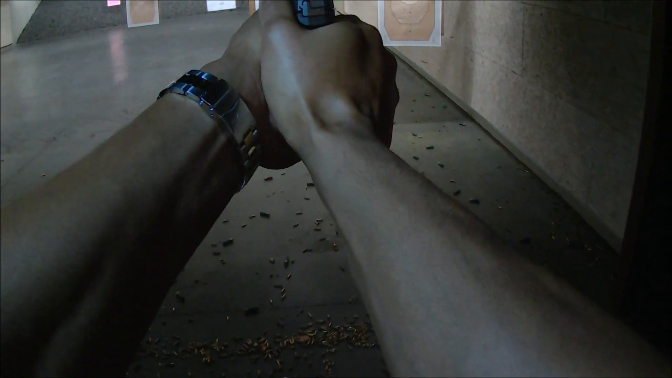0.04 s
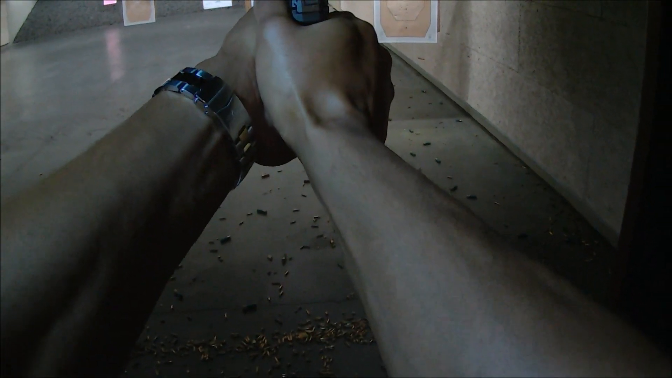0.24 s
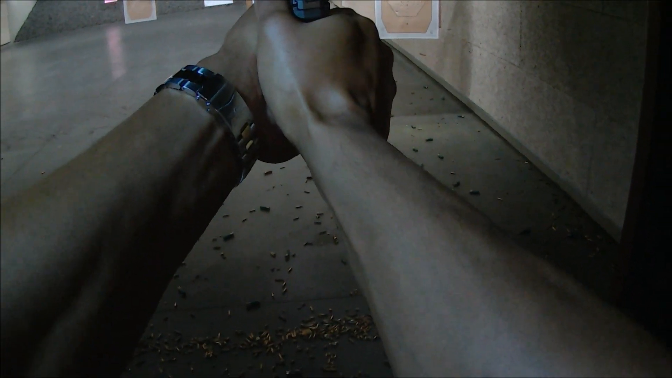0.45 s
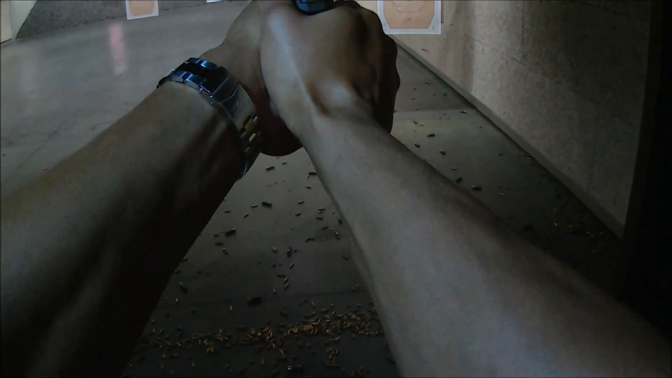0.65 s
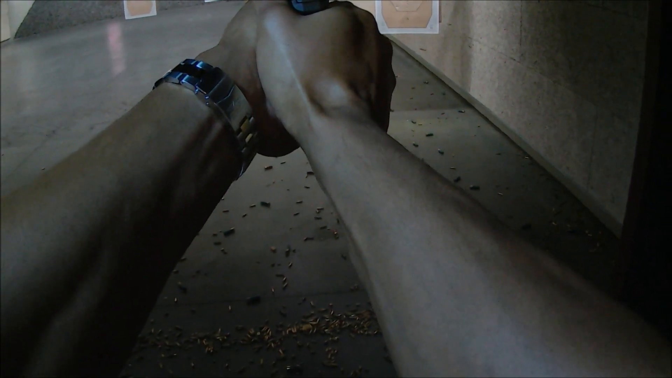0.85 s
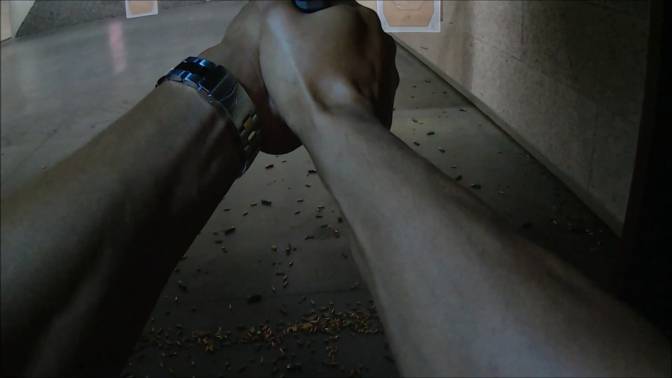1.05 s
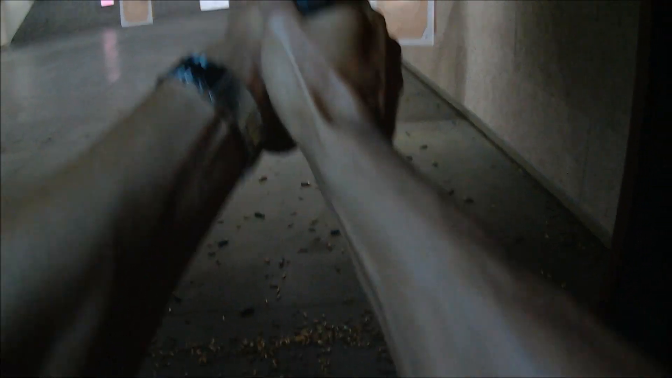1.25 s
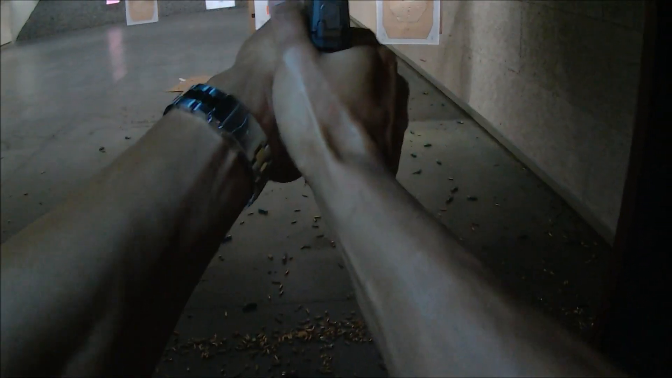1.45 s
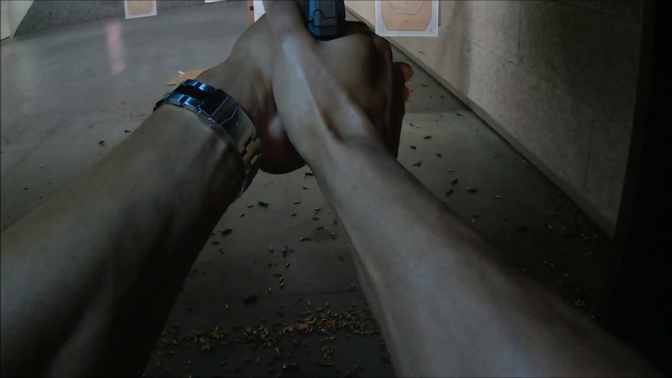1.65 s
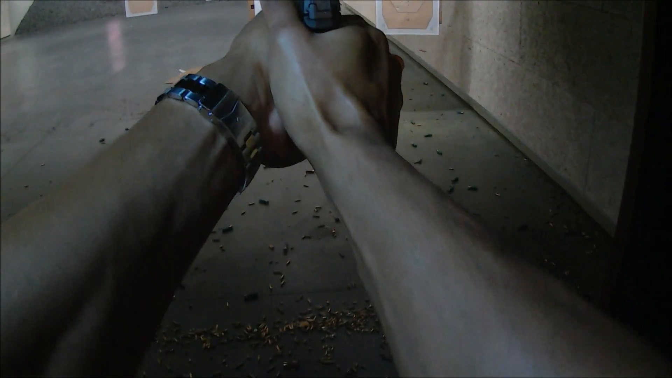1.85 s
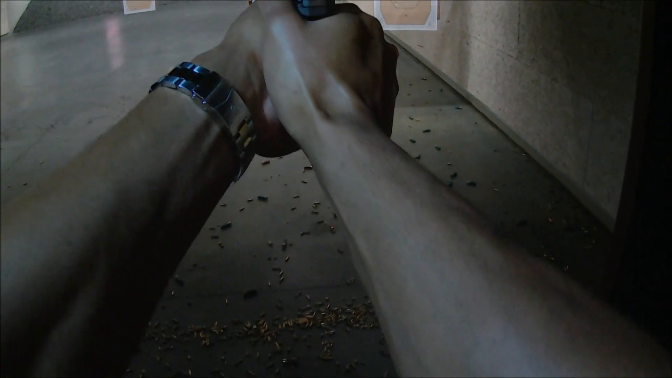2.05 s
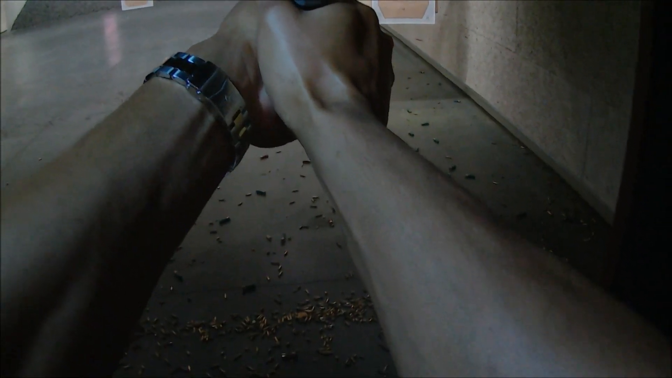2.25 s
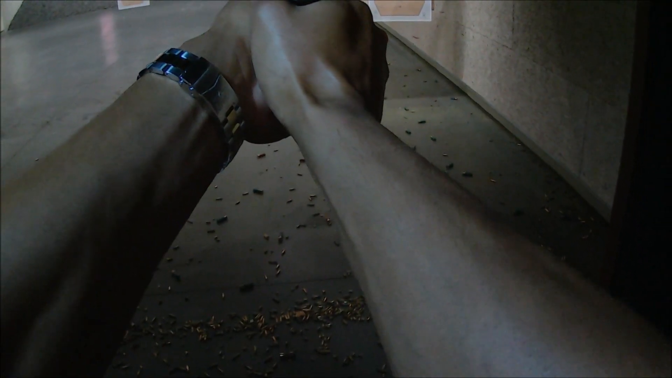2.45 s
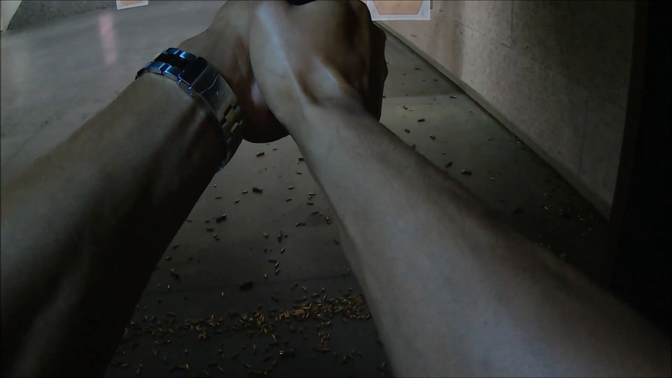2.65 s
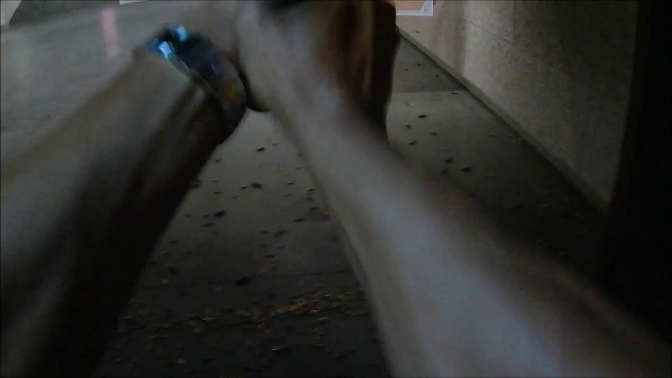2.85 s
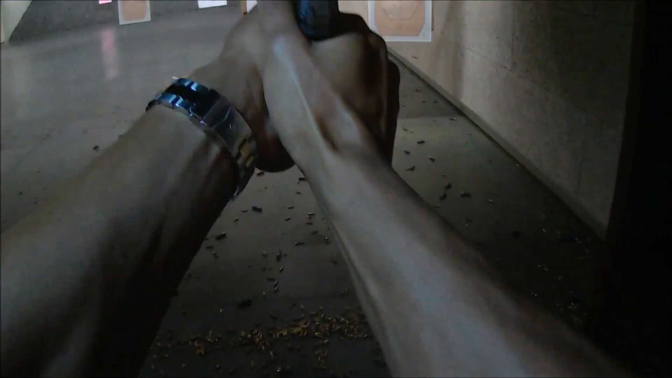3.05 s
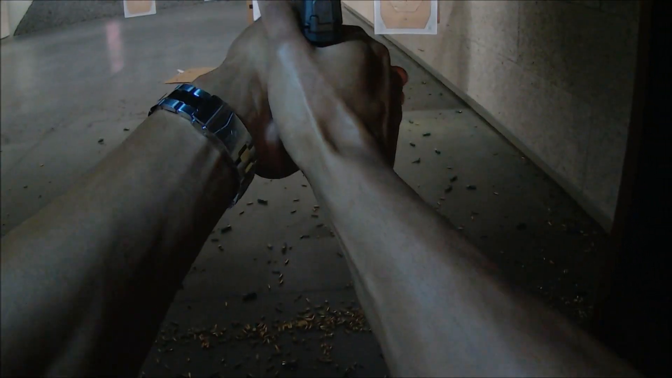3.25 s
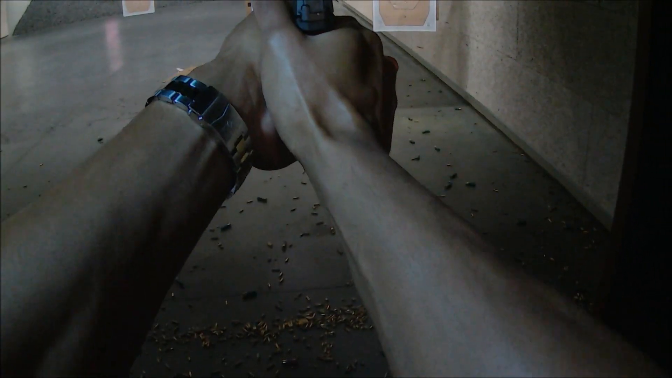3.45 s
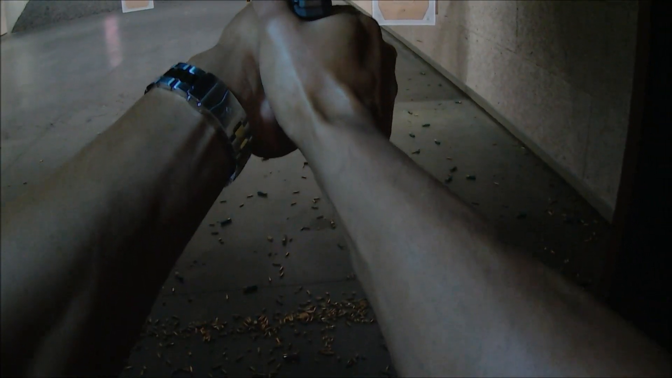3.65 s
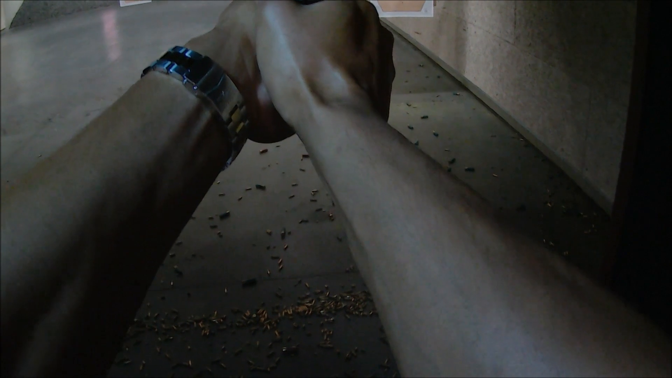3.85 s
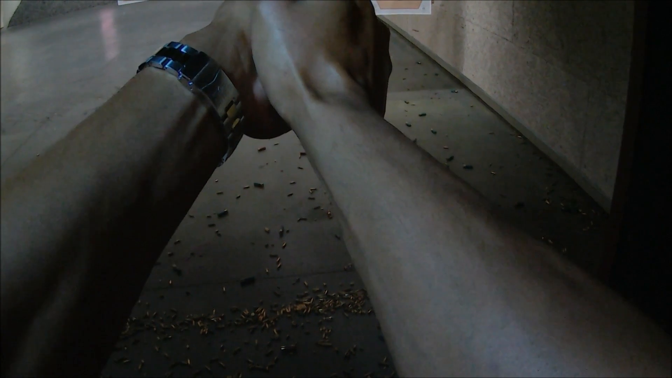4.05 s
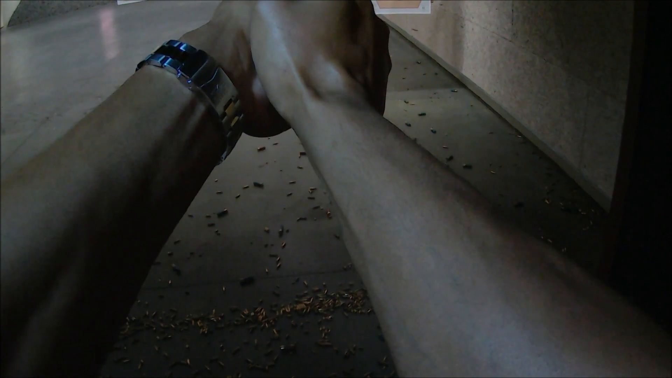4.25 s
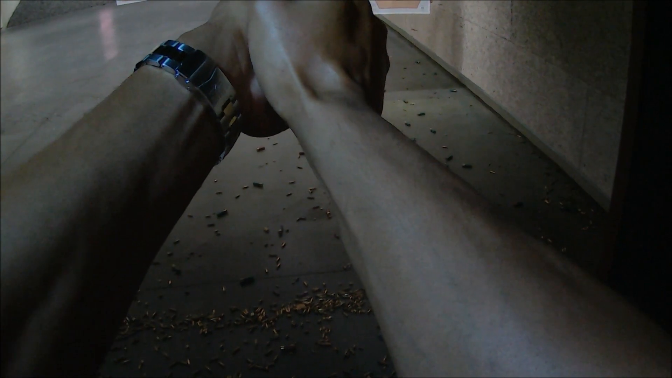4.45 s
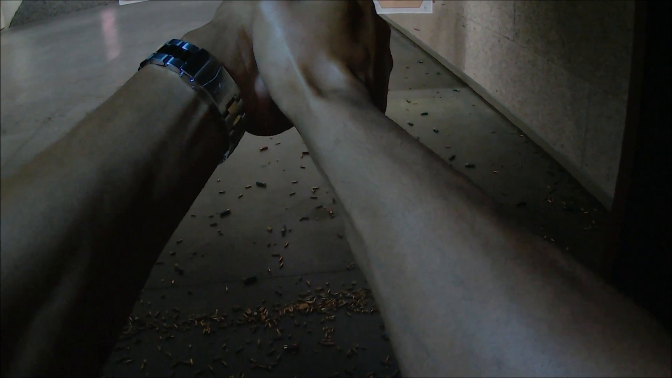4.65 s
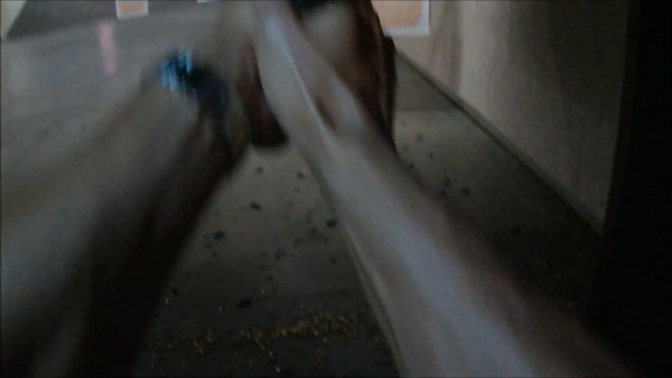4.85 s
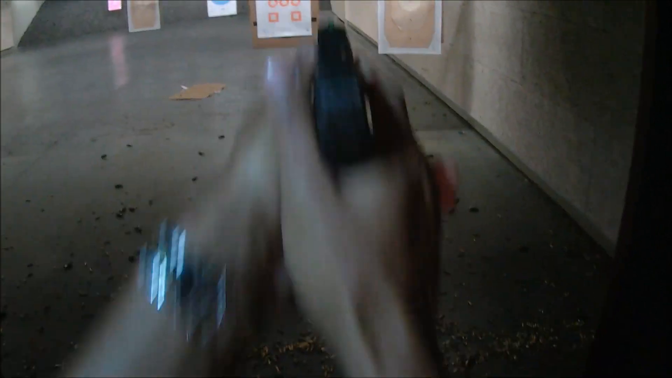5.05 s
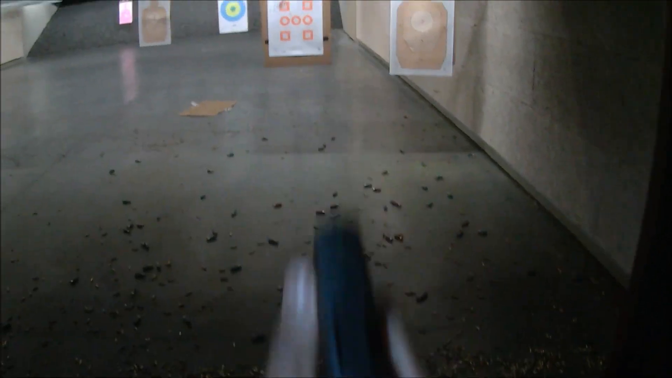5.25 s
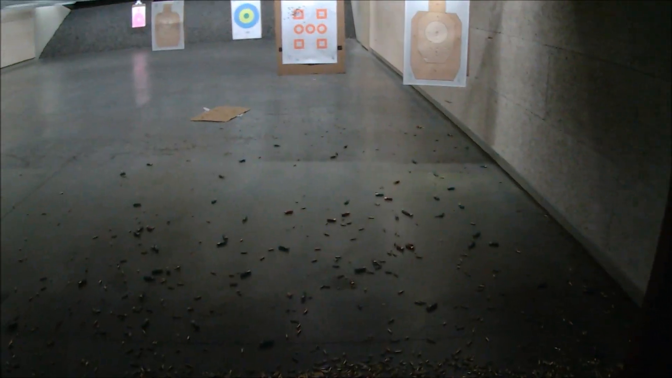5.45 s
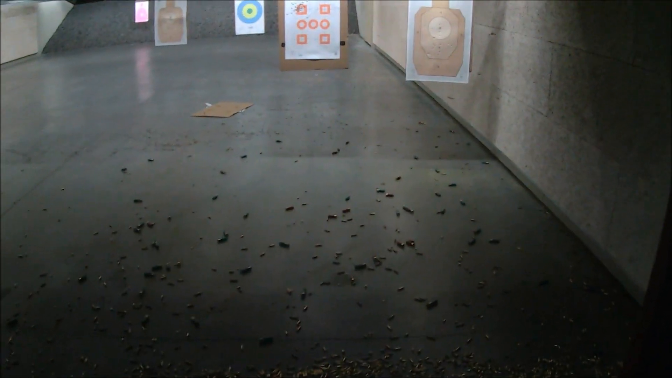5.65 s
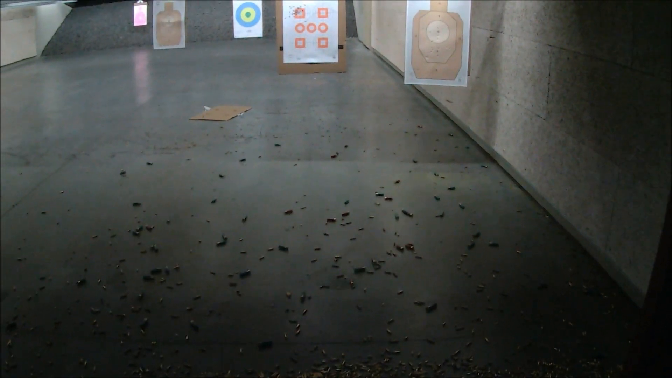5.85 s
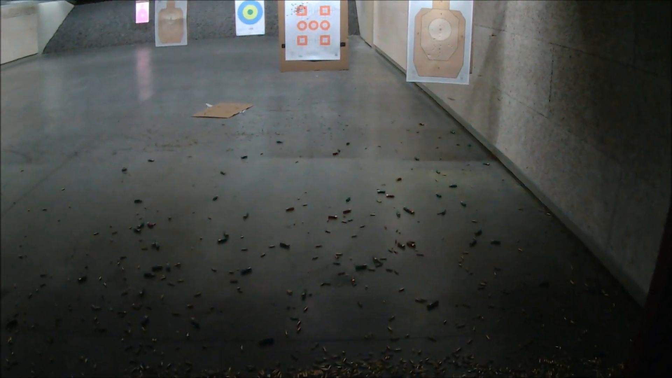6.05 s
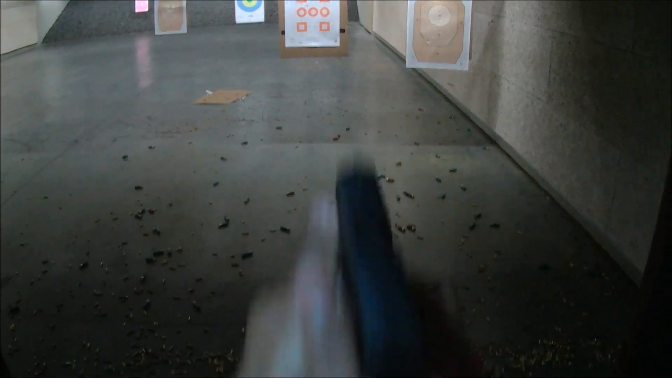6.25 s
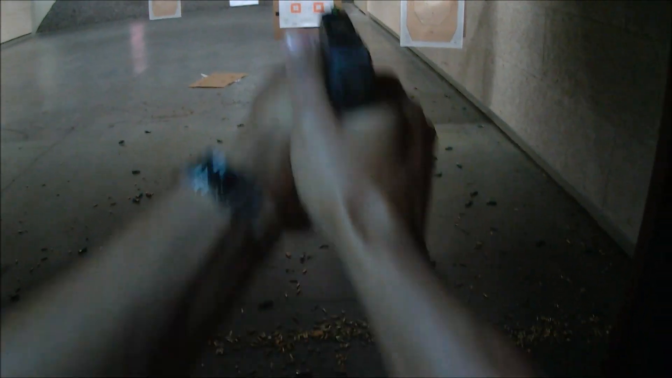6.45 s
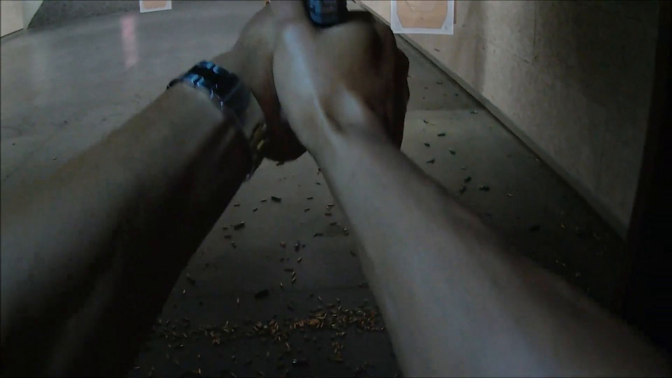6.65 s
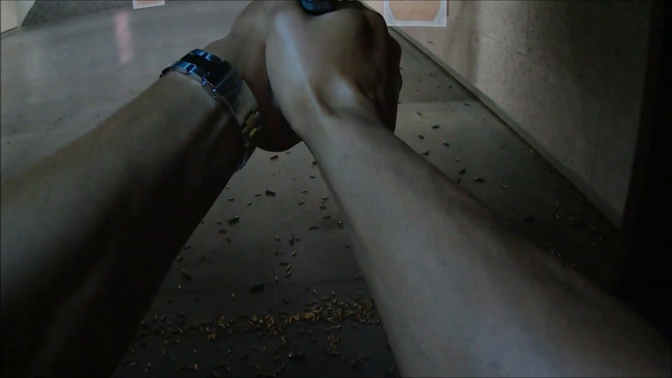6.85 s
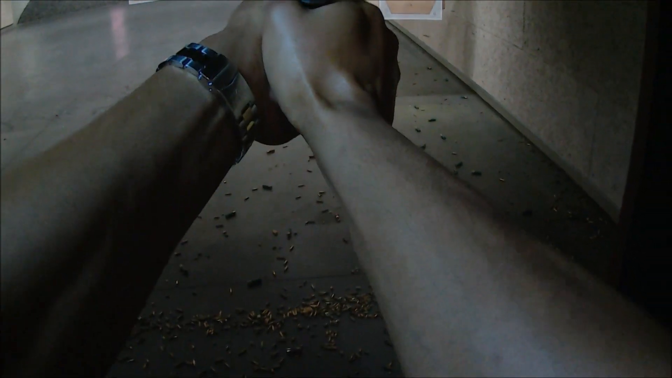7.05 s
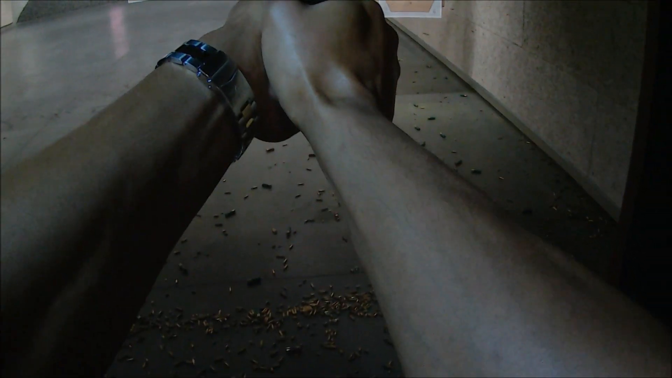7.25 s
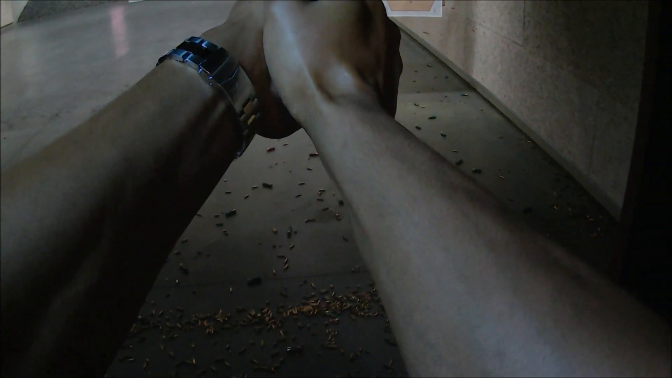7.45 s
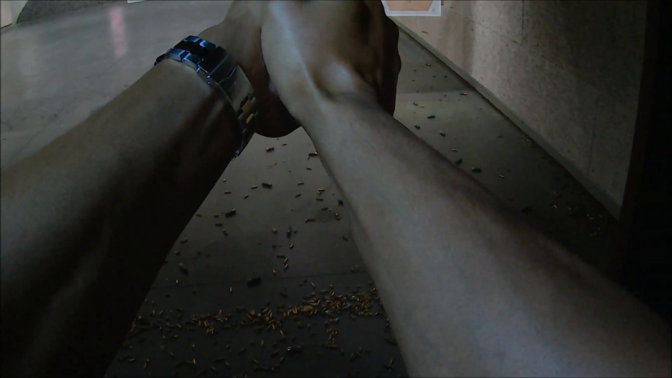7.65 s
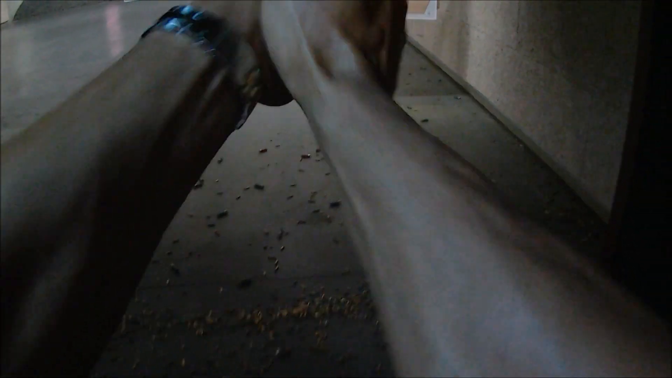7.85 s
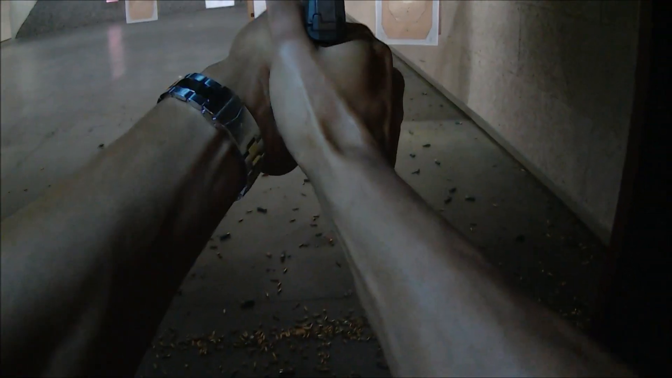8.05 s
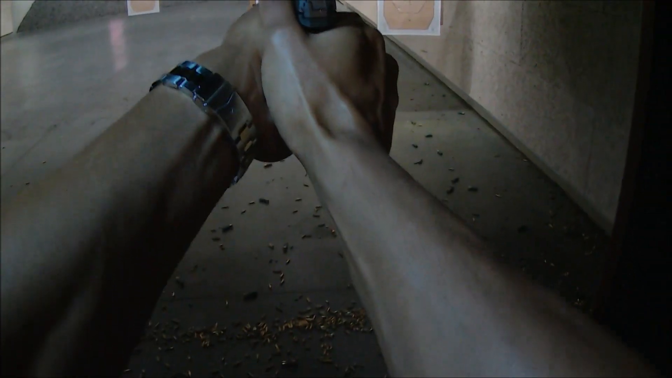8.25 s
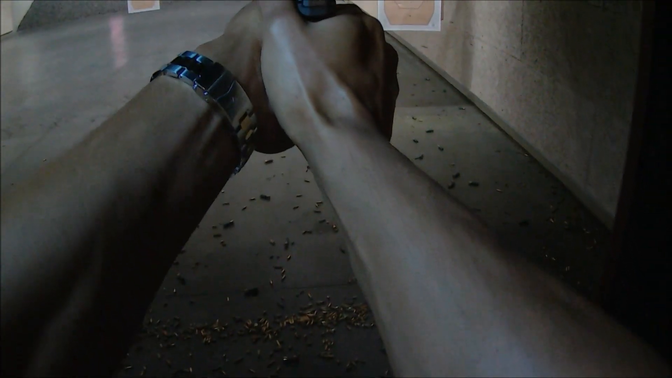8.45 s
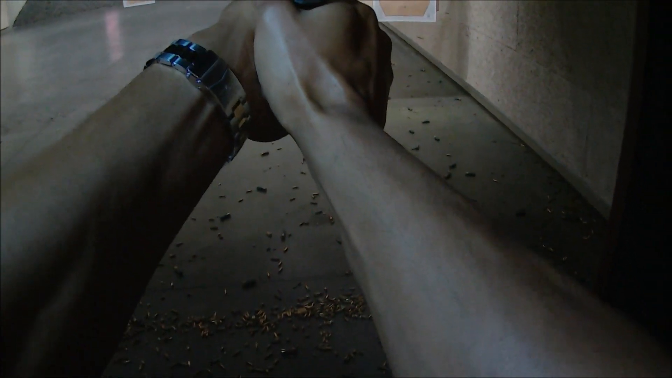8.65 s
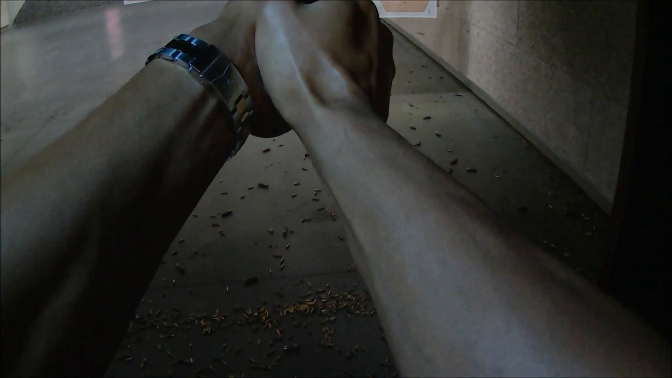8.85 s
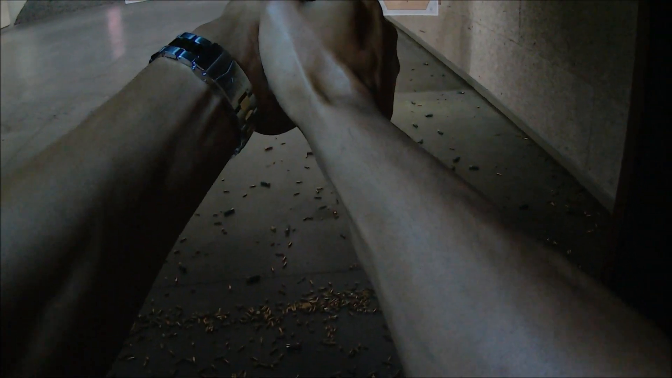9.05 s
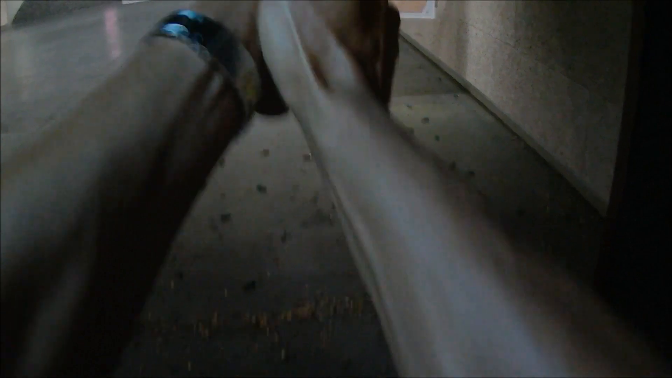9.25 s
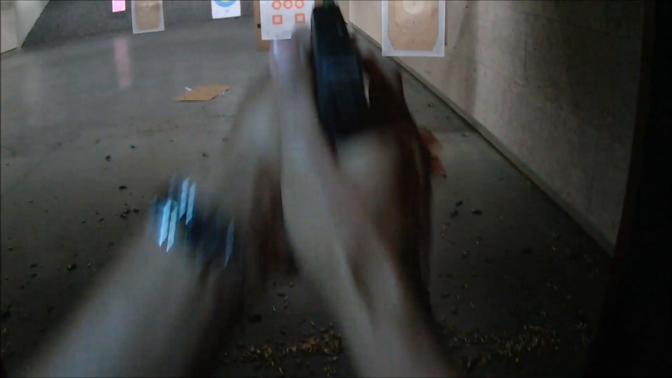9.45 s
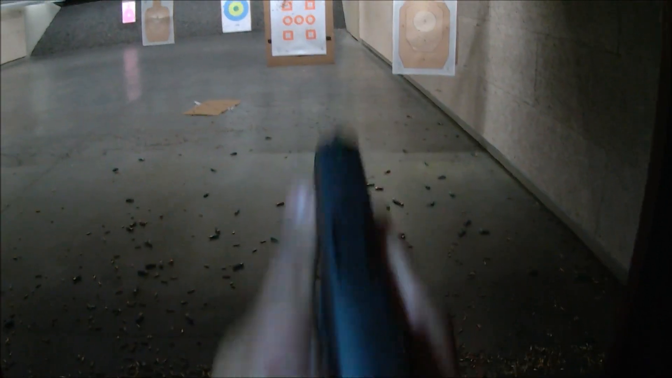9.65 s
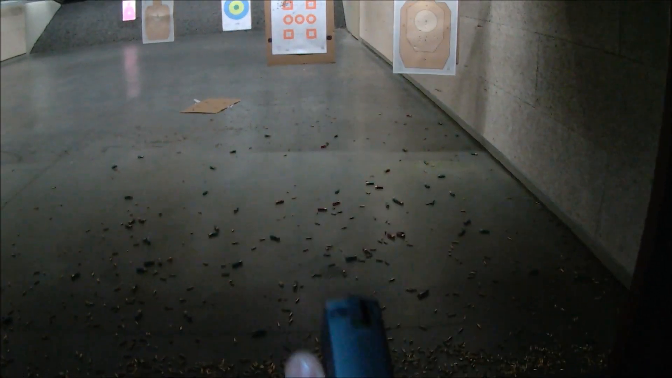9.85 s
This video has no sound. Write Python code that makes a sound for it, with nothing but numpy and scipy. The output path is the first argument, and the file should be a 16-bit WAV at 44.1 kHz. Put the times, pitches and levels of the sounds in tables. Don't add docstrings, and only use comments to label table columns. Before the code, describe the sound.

A steady, muffled ventilation rush fills a concrete shooting hall. A casing ticks at 0.2 s and a distant hinge squeaks softly around 0.3-0.5 s. At 1.1 s two pistols fire almost together, a harsh overloaded bang with dense echo and low boom; brass tinkles near 1.5-1.9 s. A dull far door thud at 2.75 s is swallowed by a near shot at 2.9 s. Casings and a soft knock follow at 3.3 s. Shots from different lanes hit at 4.2 and 4.7 s, with a sharp click between; a casing rings at 5.6 s. More blasts come at 6.2, 6.8 and 7.8 s, with a click at 7.2 s and a firm case knock at 7.3 s. A hard knock rattles at 8.5 s. The strongest shot cracks at 9.2 s, a casing clinks at 9.5 s, and the hardest knock lands at 9.9 s in the fading echo.

```python
import sys
import numpy as np
from scipy import signal
from scipy.io import wavfile
from scipy.ndimage import uniform_filter1d

SR = 44100
rng = np.random.default_rng(int(sys.argv[2]) if len(sys.argv) > 2 else 0)


def ratio(d):
    e = np.asarray(d, float) / 20
    return 10 ** e


def int16_out(signal):
    q = np.round(np.clip(np.atleast_2d(signal).T, -1, 1) * 32767)
    wavfile.write(sys.argv[1], SR, q.astype(np.int16))


N = 436590


def evened(x):
    return x / np.sqrt(np.mean(x ** 2) + 1e-20)


def read(points, hz):
    f, value = np.transpose(points)
    return np.interp(np.log(hz + 1), np.log(f + 1), value)


def add(mix, s, sound):
    part = mix[round(s * SR):][:len(sound)]
    part += sound[:len(part)]


def ring(x, hz, width):
    return signal.lfilter(*signal.iirpeak(hz, hz / width, SR), x)


def line_filter():
    coupling_hz, treble_lift = 61.9, .15
    pole = np.exp(-2 * np.pi * coupling_hz / SR)
    return np.convolve([1, -1], [1 + treble_lift, -treble_lift]), [1, -pole]


# frequency in Hz, level in dB.
CASE_PASSES = [(430, -9), (1000, -4), (1550, 0), (2500, -13), (3300, -6.5), (5200, -28), (10000, -37.5),
               (13000, -66.5)]


def noise(seconds, db_at, size=1024):
    hop = size // 4
    hz = np.fft.rfftfreq(size, 1 / SR)
    t = np.arange(seconds * SR // hop + 5) * hop / SR
    real, imaginary = rng.standard_normal((len(t), len(hz), 2)).T
    line_gain = abs(signal.freqz(*line_filter(), np.maximum(hz, 20), fs=SR)[1])
    case_gain = ratio(read(CASE_PASSES, hz)) / line_gain
    z = (real + 1j * imaginary) * ratio(db_at(hz[:, None], t)) * case_gain[:, None]
    return signal.istft(z, nperseg=size, noverlap=size - hop)[1][:seconds * SR]


# frequency in Hz, level in dB per Hz.
AIR_COLOUR = [(25, 10), (50, 12), (85, 13.5), (120, 2.5), (160, 0.), (230, 4), (320, -1.5), (430, 0.)]


def ventilation():
    air_db, swell_db = -46, 0.77
    rates_hz = np.geomspace(.2, 5, 12)[:, None]
    phases = rng.random(rates_hz.shape)

    def level_db(hz, t):
        swell = evened(np.sin(2 * np.pi * (rates_hz * t + phases)).sum(0))
        return read(AIR_COLOUR, hz) + swell_db * swell

    rush = noise(10, level_db, size=4096)[:N]
    return ratio(air_db) * rush / np.std(signal.lfilter(*line_filter(), rush))


# start in seconds, peak in dB, low ring in dB, high ring in dB.
CASING_BOUNCES = [(.2214, -49, -10, -15), (1.503, -45.5, -8, 0.), (1.68, -56, -10, -20),
                  (1.75, -43, -3, -20), (1.8896, -51.5, -12, 1.5), (2.4987, -52, -2.5, -8),
                  (3.2919, -45, -3, -4), (3.3548, -44, -3, -15), (3.7504, -54, -12, -3),
                  (5.43, -60, -15, 4), (5.5847, -38, -4, -11), (6.1365, -50, -10, -5),
                  (6.48, -49, -12, -2.5), (6.5894, -54, -12, -9), (6.66, -55, -12, 3),
                  (6.79, -52, -10, -11), (7.291, -33, -8, -22), (7.4894, -54, -10.5, -15),
                  (8.31, -57, -11, 1.5), (8.5544, -52, -8, 3), (8.83, -60, -12, 1.5),
                  (9.1494, -60, -5, -20), (9.4903, -36, -15, -24)]
# frequency in Hz, width in Hz.
BRASS_TONES = [(5200, 700), (9700, 450), (10850, 110)]


def casings():
    t, out = np.arange(SR // 3) / SR, np.zeros(N)
    for s, peak_db, low_db, high_db in CASING_BOUNCES:
        t60 = max(.13 + .003 * high_db, .03)
        scrape = rng.standard_normal(len(t))
        tick = ring(ring(scrape, 7500, 8000), 7500, 8000) * ratio(-5.5 - 60 * t / (.6 * t60))
        low, mid, high = (evened(ring(ring(scrape, hz, width), hz, width)) for hz, width in BRASS_TONES)
        rings = (ratio(low_db) * low + ratio(-11) * mid) * ratio(-60 * t / t60)
        rings += ratio(high_db - 3 - 16 * t / t60) * high
        add(out, s, ratio(peak_db) * (tick + .5 * rings))
    return out


# start in seconds, frequency in Hz, level in dB, rise in seconds, t60 in seconds.
DOOR_TONES = [
    (.29, 1020, -43, .04, .35),
    (.4, 1200, -46, .025, .22),
    (2.75, 146, -33., 0.1, .6),
]


def far_door():
    t, out = np.arange(SR // 2) / SR, np.zeros(N)
    for s, hz, db, rise, t60 in DOOR_TONES:
        envelope = ratio(db - 60 * t / t60) * (1 - np.exp(-(t / rise) ** 2))
        add(out, s, envelope * np.sin(2 * np.pi * hz * t))
    return out


# frequency in Hz, t60 in seconds.
HALL_T60 = [(50, 1.05), (130, .58), (300, .5), (800, .73), (1400, .63), (3000, .59), (6400, .4)]
# frequency in Hz, level in dB.
DOWN_RANGE = [(200, -15.5), (800, -18.5), (2000, -26.5)]


def echo(colour, lane):
    level_db, early_db, early_s, _, stretch = lane
    backstop_s, backstop_width_s, backstop_db = .185, .07, 3.8
    down_range_t60 = 2.1

    def level(hz, t):
        age = t - .25
        early = early_db * np.exp(-t / early_s)
        backstop = backstop_db * np.exp(-((t - backstop_s) / backstop_width_s) ** 2)
        main = ratio(early + backstop - 60 * age / (stretch * read(HALL_T60, hz)))
        late = ratio(read(DOWN_RANGE, hz) - 60 * age / down_range_t60)
        return read(colour, hz) + 20 * np.log10(np.hypot(main, late))

    x = noise(2, level)
    mids = ring(x, 1200, 1500)[SR // 5:SR * 3 // 10]
    return ratio(level_db) * x / np.std(mids)


# start in seconds, blast strength in dB.
LEFT_FIRES = [
    (1.1300, 0.),
    (4.1688, .7),
    (6.1578, 0.),
]
NEAR_FIRES = [
    (1.1450, -0.3),
    (2.8770, .1),
    (4.7442, 0.5),
    (7.8269, -.2),
    (9.2205, 1.2),
]
RIGHT_FIRES = [
    (6.8355, 0.),
]
# frequency in Hz, level in dB per Hz.
LEFT_ECHO = [(40, 1.5), (80, 7), (300, -9), (700, -5), (1500, -8.5), (2300, -14), (3400, -14), (5000, -19)]
NEAR_ECHO = [(45, -1.5), (85, 6), (330, -4.5), (700, 5), (1500, .3), (2100, -7.5), (3400, -7.5),
             (5000, -12.5)]
RIGHT_ECHO = [(40, .5), (80, 7.5), (330, -7), (800, -3), (1500, -8), (2120, -12.5), (3640, -12.5),
              (6000, -14)]
# frequency in Hz, level in dB, t60 in seconds, build-up in seconds.
LEFT_MODES = [(45, 6, .22, .003), (63.94, -3, 1.304, 0.022), (81.04, -4.5, .9, .08), (100, 4.5, .2, .004),
              (144.2, 2.5, .65, .04), (285, 1.5, .35, .02)]
NEAR_MODES = [(61, -10, 1.1, .1), (69.8, -8, 1., .1), (79, -3.5, .9, .1), (141.9, -2.5, .6, .04),
              (336, 12, .3, .02), (1228, 7, .4, .04)]
RIGHT_MODES = [(81, 6, 0.87, .1), (62, -7, 1.2, .08), (140, 2.5, .55, .02), (335, 10, .3, .02),
               (390.4, 8, .3, .02)]
# mid echo in dB at a quarter second, extra early echo in dB, its fade in seconds,
# echo build-up in seconds, decay stretch as a factor.
LEFT_SPACE = (-14.8, -1.5, 0.12, 0.012, 1.0)
NEAR_SPACE = (-14.3, 4.8, 0.13, 0.0015, .98)
RIGHT_SPACE = (-12.8, 1.5, 0.15, 0.002, 1.01)
# front in dB, bounce in Hz, front fade in seconds,
# bright slap in dB, slap t60 in seconds.
LEFT_MUZZLE = (18., 520, .004, 3., .2)
NEAR_MUZZLE = (18., 650, .0012, 13.3, .15)
RIGHT_MUZZLE = (16., 600, .002, 10.5, .12)


def gun(shots, colour, boom, lane, blast, same=.93):
    t, out = np.arange(2 * SR) / SR, np.zeros(N)
    front_db, bounce_hz, front_s, slap_db, slap_t60 = blast
    slap_hz, slap_width_hz = 2900, 2400
    pattern = echo(colour, lane)
    waves = np.zeros(len(t))
    for hz, db, t60, rise in boom:
        envelope = ratio(db - 60 * t / t60) * (1 - np.exp(-(t / rise) ** 2))
        waves -= envelope * np.sin(2 * np.pi * hz * t)
    front = -ratio(front_db) * np.sin(2 * np.pi * bounce_hz * t) * np.exp(-t / front_s)
    build = 1 - np.exp(-(t / lane[3]) ** 2)
    for s, strength_db in shots:
        tail = same * pattern + np.sqrt(1 - same ** 2) * echo(colour, lane)
        hiss = rng.standard_normal(len(t))
        bright = evened(ring(ring(hiss, slap_hz, slap_width_hz), slap_hz, slap_width_hz))
        slap = bright * ratio(slap_db - 60 * t / slap_t60) * np.minimum(t * bounce_hz, 1)
        add(out, s, ratio(strength_db) * (front + waves + tail * build + slap))
    return out


# start in seconds, peak in dB, body in Hz, body in dB, t60 in seconds.
CASE_KNOCKS = [
    (3.2915, -30, 1250, -14, .07),
    (7.291, -19, 1250, -14, .16),
    (8.5264, -9, 1450, -4.5, .12),
    (8.5544, -27, 1600, -2.5, .1),
    (8.8384, -35, 1700, -3.5, .04),
    (9.662, -31, 1250, -19, .36),
    (9.88, -6, 1000, 9, .12),
]
# frequency in Hz, width in Hz, level in dB.
CASE_SHELL = [(3350, 420, -3), (8000, 3000, -25)]


def knocks():
    t, out = np.arange(SR // 3) / SR, np.zeros(N)
    band = signal.butter(2, (500, 9000), "band", fs=SR)
    for s, peak_db, body_hz, body_db, t60 in CASE_KNOCKS:
        scatter = ratio(-21 + 60 * t60 - 60 * t / t60)
        crack = ratio(-60 * t / 0.011)
        blow = rng.standard_normal(len(t)) * (crack + scatter) * np.minimum(t / 0.0018, 1)
        body = np.zeros(len(t))
        for hz, width, db in CASE_SHELL + [(body_hz, 850, body_db)]:
            body += ratio(db) * ring(ring(blow, hz, 1.4 * width), hz, 1.4 * width) / np.sqrt(width)
        body = signal.lfilter(*band, body)
        add(out, s, ratio(peak_db) * body / abs(body).max())
    return out


# start in seconds, peak in dB.
DRY_CLICKS = [
    (4.387, -9),
    (6.5894, -36),
    (7.1896, -18),
    (8.2906, -37),
    (9.4903, -24),
    (9.891, -28),
]


def clicks():
    t, out = np.arange(SR // 3) / SR, np.zeros(N)
    hz, width_hz, makeup_db = 6000, 6500, 13.
    click = ring(ring(1. * (t == 0), hz, width_hz), hz, width_hz)
    for s, db in DRY_CLICKS:
        add(out, s, ratio(db + makeup_db) * click)
    return out


def preamp(x):
    rail, flip_at, flip_share = 0.69, 1.12, .24
    over = abs(x) > flip_at
    enters = over & ~np.roll(over, 1, axis=1) & (rng.random(x.shape) < flip_share)
    flips = enters | np.roll(enters, 1, axis=1)
    return np.clip(x, -rail, rail) * np.where(flips, -1, 1)


# frequency in Hz, level in dB.
GRIT_LEVEL = [(300, -27), (2000, -13.5), (6000, -4.5)]


def grain(x):
    gate_hz, gate_db, hole_hz, hole_share = 9900, -86, 4600, .035
    hz, t, z = signal.stft(x, SR, nperseg=256)
    power = uniform_filter1d(abs(z) ** 2, size=7, axis=1)
    held = np.sqrt(abs(uniform_filter1d(power, size=5, axis=2, origin=2)))
    grit = ratio(read(GRIT_LEVEL, hz)[:, None]) * held * np.exp(2j * np.pi * rng.random(z.shape))
    draws = np.repeat(rng.random((len(t) // 8 + 1, 2)), 8, axis=0)[:len(t)]
    wander, hole = draws.T
    in_hole = hole < hole_share
    edge_hz = np.where(in_hole, hole_hz, gate_hz + 1200 * (wander - .5))
    loud_enough = held > ratio(np.where(in_hole, gate_db + 8, gate_db))
    kept = (hz[:, None] < edge_hz) | loud_enough
    return signal.istft((z + grit) * kept, nperseg=256)[1][:, :N]


def scene():
    room = ventilation() + casings() + far_door()
    guns = gun(LEFT_FIRES, LEFT_ECHO, LEFT_MODES, LEFT_SPACE, LEFT_MUZZLE, same=0.81)
    guns += gun(NEAR_FIRES, NEAR_ECHO, NEAR_MODES, NEAR_SPACE, NEAR_MUZZLE)
    guns += gun(RIGHT_FIRES, RIGHT_ECHO, RIGHT_MODES, RIGHT_SPACE, RIGHT_MUZZLE)
    return (room + guns + knocks() + clicks())[None]


def top_cut(x):
    return signal.sosfilt(signal.butter(12, 15800, fs=SR, output="sos"), x)


def record(dry):
    line = signal.lfilter(*line_filter(), preamp(dry))
    treble_edge = signal.firwin(255, 12800, window=("kaiser", 7), fs=SR)[None]
    mix = signal.oaconvolve(grain(line), treble_edge, "same")
    return top_cut(np.clip(mix, -1, 1))


dry = scene()
out = record(dry)
int16_out(out)
```